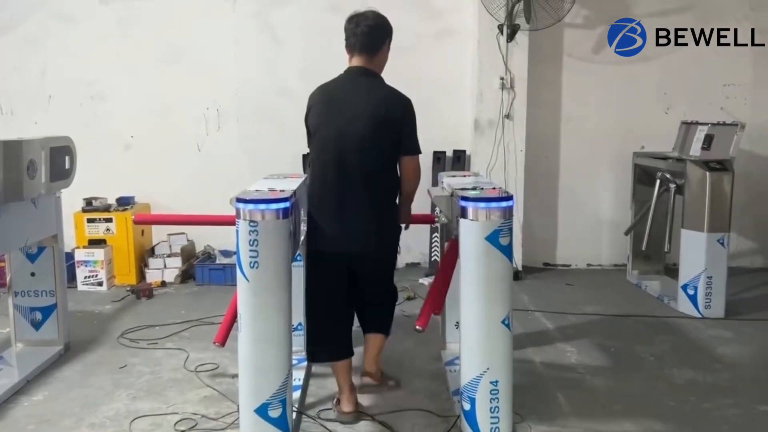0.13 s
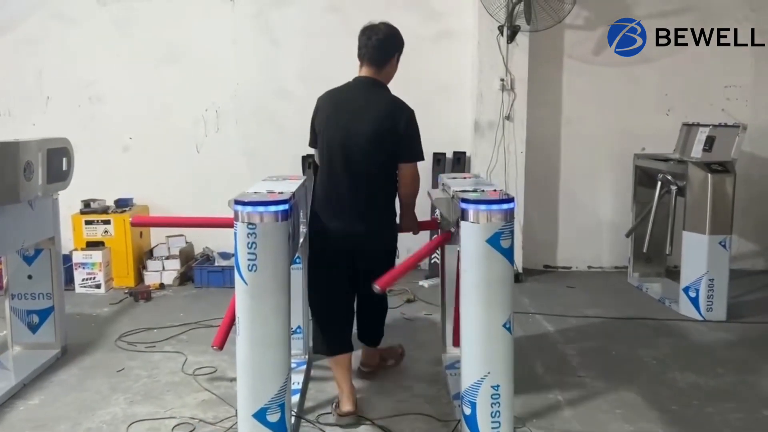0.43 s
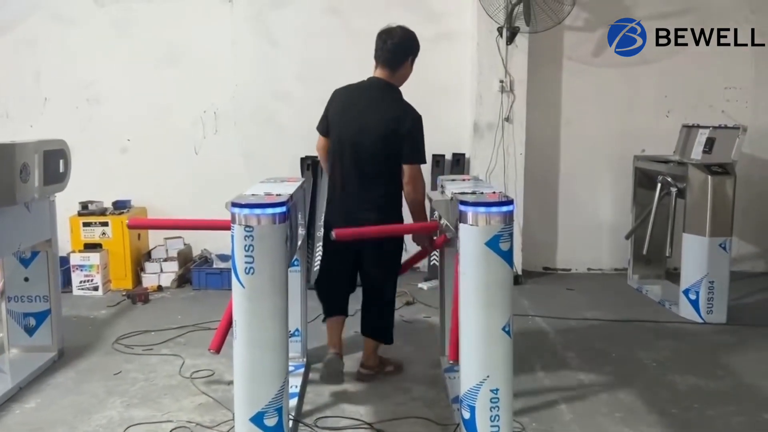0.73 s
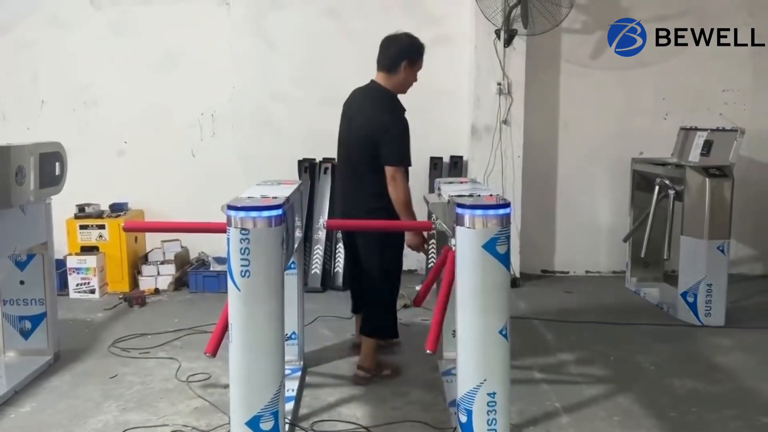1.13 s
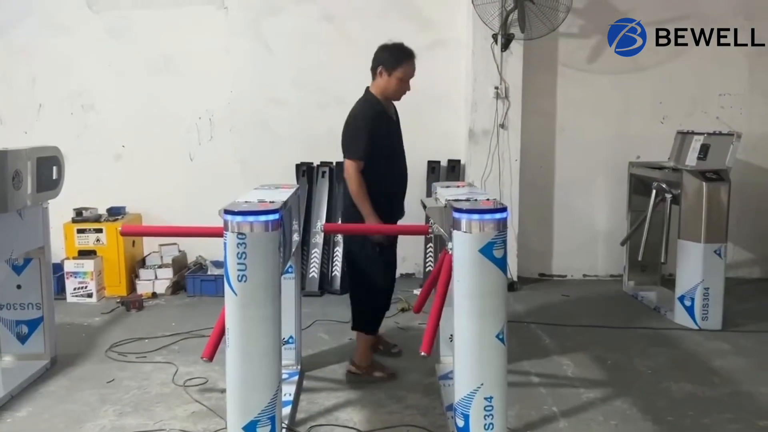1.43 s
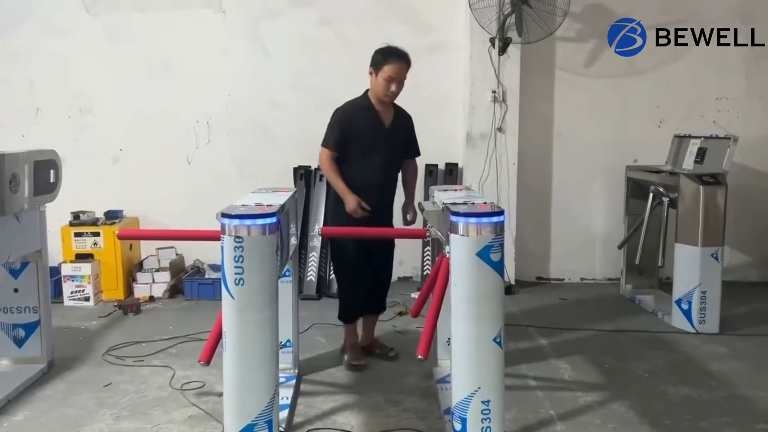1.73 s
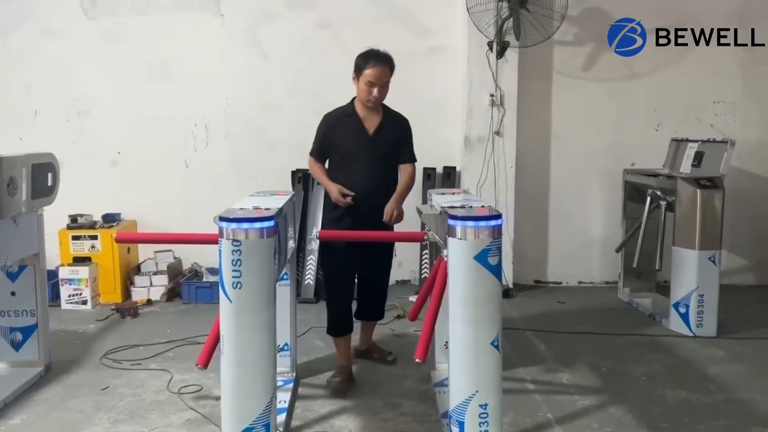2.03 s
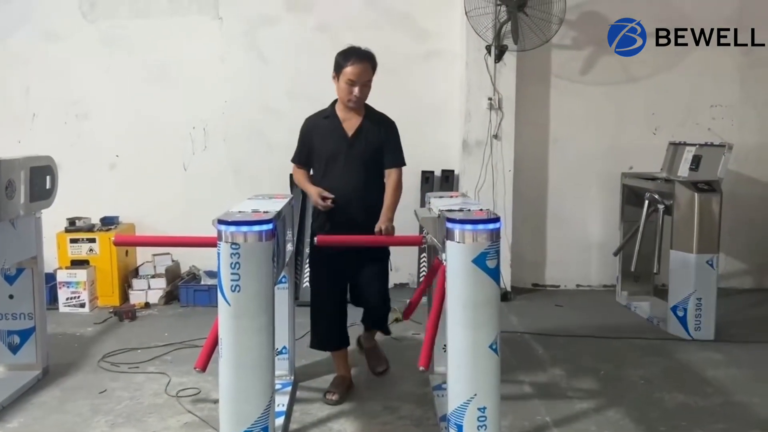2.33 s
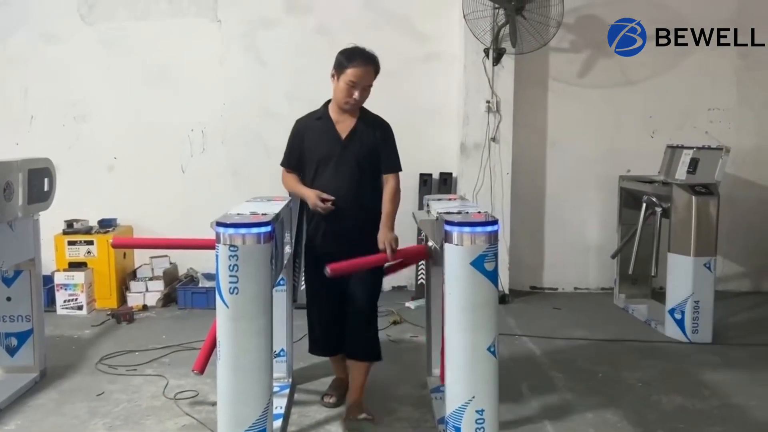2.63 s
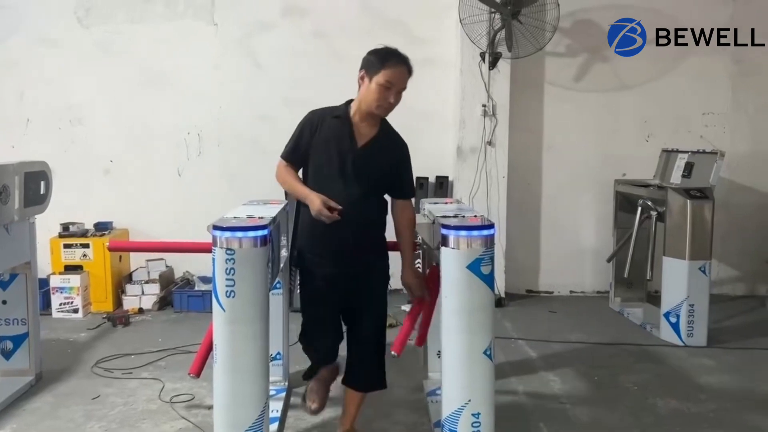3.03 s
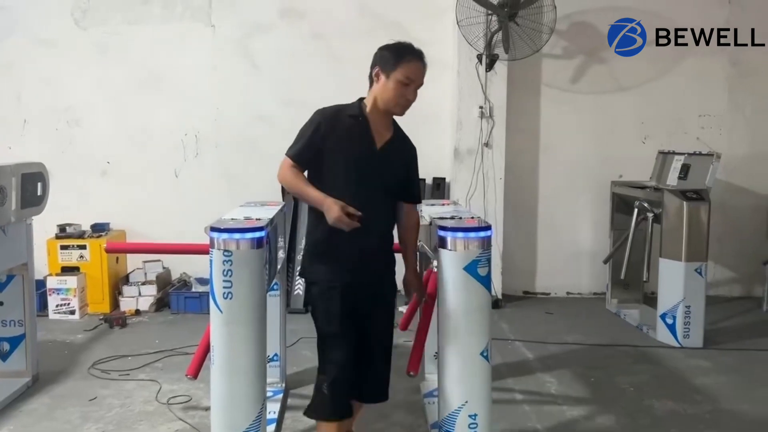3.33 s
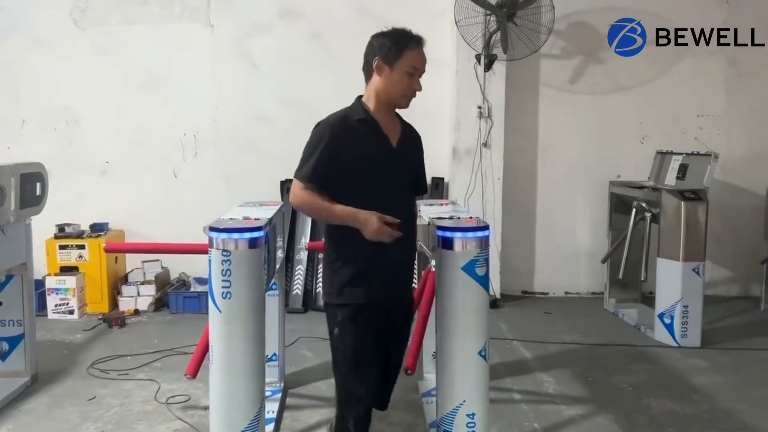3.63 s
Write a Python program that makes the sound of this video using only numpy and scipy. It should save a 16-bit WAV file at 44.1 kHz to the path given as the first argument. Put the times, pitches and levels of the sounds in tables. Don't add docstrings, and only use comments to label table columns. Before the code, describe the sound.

A metal turnstile turns in a bare concrete workshop. Its latch snaps and rattles brightly at 0.45-0.6 s, a loud roller click lands at 0.64 amid low hub rumble, then dry pawl clicks at 0.9 and hollow cabinet clunks until 1.2, all echoing. Soft sandal thuds follow near 1.4, 2.3, 2.75, 3.2 and 3.5 with faint scuffs. Fans rush and cicadas buzz throughout, on a peak-limited, compressed phone microphone.

```python
import sys
import numpy as np
from scipy import signal
from scipy.fft import rfft, irfft, next_fast_len
from scipy.io import wavfile
from scipy.ndimage import uniform_filter1d, minimum_filter1d, map_coordinates

SR = 44100
rng = np.random.default_rng(int(sys.argv[2]) if len(sys.argv) > 2 else 0)


def dump_mix(stems):
    frames = np.atleast_2d(stems).T
    limited = np.clip(frames, -1, 1)
    pcm = np.round(limited * 32767).astype(np.int16)
    wavfile.write(sys.argv[1], SR, pcm)


def rack_gain(trim_db):
    fader = np.asarray(trim_db, float)
    return 10 ** (fader / 20)


N = 167580


def unit(x):
    return x / np.sqrt(np.mean(x ** 2) + 1e-20)


def along(points, hz):
    f, v = np.transpose(points)
    return np.interp(np.log(hz + 1), np.log(f + 1), v, left=v[0] - 40, right=v[-1] - 40)


def wobble(rate, size=N):
    return map_coordinates(rng.standard_normal(100), [np.arange(size) * rate / SR])


def filtered(x, response):
    m = 2 * next_fast_len(len(x) // 2 + 4096)
    return irfft(rfft(x, m) * response(np.fft.rfftfreq(m, 1 / SR)), m)[:len(x)]


def coloured(x, spectrum):
    def response(hz):
        cepstrum = irfft(np.log(rack_gain(along(spectrum, hz)) + 1e-6))
        cepstrum[1:len(hz) - 1] *= 2
        cepstrum[len(hz):] = 0
        return np.exp(rfft(cepstrum))
    return filtered(x, response)


def rush(spectrum, patchy_db):
    z = signal.stft(rng.standard_normal(N), nperseg=512)[2]
    patches = uniform_filter1d(rng.standard_normal(z.shape), size=5, axis=0)
    patches = uniform_filter1d(patches, size=14, axis=1)
    noise = signal.istft(z * rack_gain(patchy_db * unit(patches)), nperseg=512)[1][:N]
    return unit(coloured(noise, spectrum))


# pitch_hz, fade_by_60_db_s
HALL_FADE = [(150, .85), (800, 1.0), (2500, 1.0), (8000, .55), (12000, .42)]


def hall(x):
    hz, t, z = signal.stft(rng.standard_normal(SR * 6 // 5), SR, nperseg=256)
    pitch, fade = np.transpose(HALL_FADE)
    t60 = np.interp(np.log(hz + 1), np.log(pitch), fade)
    tail = signal.istft(z * rack_gain(-60 * t / t60[:, None]), SR, nperseg=256)[1]
    tail *= 1 - np.exp(-np.arange(len(tail)) / SR / .014)
    return signal.fftconvolve(x, tail / np.linalg.norm(tail))


def struck(hits, modes, colour, ring_db, damp, crack_s, attack_s, wet_db, blur, tilts=None):
    scatter_db = 2.5
    out = np.zeros(N + 3 * SR)
    t = np.arange(SR // 2) / SR
    for k, (start_s, db) in enumerate(hits):
        ring = 0
        for hz, level, t60 in modes:
            fade_db = -60 * t / min(t60 * damp, .6)
            loudness = rack_gain(level + scatter_db * rng.standard_normal() + fade_db)
            ring = ring + loudness * np.sin(2 * np.pi * hz * t + blur * wobble(70, size=len(t)))
        crack = coloured(rng.standard_normal(len(t)) * rack_gain(-60 * t / crack_s), colour)
        blow = rack_gain(ring_db) * ring + crack / np.abs(crack).max()
        blow *= 1 - np.exp(-t / attack_s)
        if tilts:
            treble = rack_gain(tilts[k])
            blow = filtered(blow, lambda hz: (1 + 1j * treble * hz / 5000) / (1 + 1j * hz / 5000))
        wet = rack_gain(wet_db) * hall(blow)
        wet[:len(t)] += blow
        start = round(start_s * SR)
        out[start:][:len(wet)] += rack_gain(db) * wet[:len(out) - start]
    return out[:N]


# start_s, level_db
SNAP_HITS = [
    (.4535, -15.5),
    (.4565, -7),
    (.4615, -10.5),
    (.473, -5),
    (.482, -5.5),
    (.514, -9),
    (.5406, -19.5),
    (.575, -8),
]
SNAP_TREBLE = [16.5, 10, 9.5, -9, -29, -12, 6, -12]
# pitch_hz, level_db, fade_by_60_db_s
LATCH_MODES = [(806, -1.5, 0.096), (882, -12, 0.28), (933, -2, 0.24), (1200, -1.5, 0.11), (1754, -6, 0.16),
               (1820, -9.5, 0.11), (1902, -8, 0.066), (3026, -16, 0.16), (4100, -21.5, .1),
               (4686, -10, 0.054), (7710, -4, 0.075), (7960, -10, 0.15), (8300, -10, 0.072),
               (11000, -16, 0.1)]
# pitch_hz, level_db
SNAP_NOISE = [(150, -4), (914, 2.5), (4200, -12), (5800, -22), (7900, -9.5), (9800, -10.5), (11200, -10.5),
              (12100, -20)]


def latch_snap():
    return struck(SNAP_HITS, LATCH_MODES, SNAP_NOISE, ring_db=-12.0, damp=0.73, crack_s=0.037,
                  attack_s=0.00043, wet_db=1.5, blur=0.46, tilts=SNAP_TREBLE)


# start_s, level_db
CLUNK_HITS = [
    (.918, -12),
    (.930, -4),
    (.955, -9),
    (.98, -13),
    (1.02, -10.5),
    (1.045, -11),
    (1.1, -18),
    (1.17, -10),
]
# pitch_hz, level_db, fade_by_60_db_s
CABINET_MODES = [(115, -11.5, 0.23), (141, -4.5, 0.25), (178.7, 2, 0.31), (243, -5, 0.21),
                 (298.6, -2.5, 0.3), (480, -14, 0.33), (683, -15, 0.13), (830, -20, 0.089)]
# pitch_hz, level_db
CABINET_NOISE = [(53, -38), (90, -6.5), (182, -3.5), (459, -14.5), (486, -10.5), (615, -17), (3000, -40),
                 (3900, -80), (6600, -120)]


def hub_clunks():
    return struck(CLUNK_HITS, CABINET_MODES, CABINET_NOISE, ring_db=-7.5, damp=0.49, crack_s=0.092,
                  attack_s=0.0023, wet_db=-0.1, blur=.3)


# start_s, level_db
LURCHES = [
    (.47, -17),
    (.52, -29),
    (.59, -10.5),
    (.628, -11.5),
    (.665, -8),
    (.695, -6.5),
    (.735, -12),
]
# pitch_hz, level_db, fade_by_60_db_s
FRAME_MODES = [(106.6, -1.5, 0.32), (150, -4, .2), (192, -7, 0.23), (245, 0, 0.21), (335, -7, 0.14)]


def hub_rumble():
    return struck(LURCHES, FRAME_MODES, CABINET_NOISE, ring_db=-6.5, damp=0.79, crack_s=0.066,
                  attack_s=0.0046, wet_db=-2.5, blur=0.21)


# start_s, level_db
CAM_HITS = [
    (.639, 1),
    (.654, -7),
    (.704, -13),
]
# pitch_hz, level_db, fade_by_60_db_s
ROLLER_MODES = [(760, -11, 0.19), (1360, -7, 0.044), (1977, -3, 0.018), (2310, 0.5, 0.045),
                (2540, -11, 0.016), (7400, -31, 0.049)]
# pitch_hz, level_db
ROLLER_NOISE = [(300, -19), (1000, -15.5), (2400, -14.5), (3000, -28.5), (5500, -32.5), (7800, -26.5),
                (10900, -24.5)]


def cam_click():
    return struck(CAM_HITS, ROLLER_MODES, ROLLER_NOISE, ring_db=-11.5, damp=0.74, crack_s=0.031,
                  attack_s=0.001, wet_db=-1.5, blur=0.35)


# start_s, level_db
PAWL_HITS = [
    (.896, -17),
    (.9035, -11),
    (.908, -8.5),
    (.9135, -9.5),
    (.930, -19),
    (.945, -25),
]
PAWL_TREBLE = [-22, -20, -16, 5, 10.5, 13]
# pitch_hz, level_db, fade_by_60_db_s
PAWL_MODES = [(782, 1, 0.03), (926, -7, 0.045), (1320, -8, 0.047), (2110, -3, 0.01), (3930, -31, .02),
              (8650, -12, 0.016), (11450, -13, 0.022)]
# pitch_hz, level_db
PAWL_NOISE = [(400, -5), (1400, -4), (3300, -10), (4200, -14.5), (5500, -20), (8000, -23), (9900, -28.5),
              (11700, -16)]


def pawl_clicks():
    return struck(PAWL_HITS, PAWL_MODES, PAWL_NOISE, ring_db=-10, damp=1.2, crack_s=0.032,
                  attack_s=0.00051, wet_db=1.5, blur=0.88, tilts=PAWL_TREBLE)


# start_s, level_db
HEEL_HITS = [
    (1.4, -12),
    (1.48, -16.5),
    (2.325, -7),
    (2.395, -23),
    (2.75, -15.5),
    (3.17, -15),
    (3.52, -14),
    (3.64, -24.5),
]
# pitch_hz, level_db, fade_by_60_db_s
SLAB_MODES = [(131.5, 9, 0.16), (110, -13, 0.24), (176, -3, 0.28), (380, -7.5, 0.12)]
# pitch_hz, level_db
HEEL_NOISE = [(50, -80.5), (110, 7.5), (250, -4.5), (600, -15), (1500, -64)]


def heel_thuds():
    return struck(HEEL_HITS, SLAB_MODES, HEEL_NOISE, ring_db=-5.5, damp=0.99, crack_s=0.066,
                  attack_s=0.0063, wet_db=-2.0, blur=0.14)


# start_s, length_s, level_db, treble_db
SCUFF_STROKES = [
    (1.315, 0.06, -31.5, 2),
    (2.29, 0.058, -34.5, 2.5),
    (2.406, 0.074, -30.5, -25),
    (2.629, 0.089, -37, 6),
    (2.739, 0.07, -31.5, -16),
    (2.844, 0.051, -34.5, -13),
    (3.181, 0.039, -31, -15),
]
# pitch_hz, level_db
GRIT_NOISE = [(300, -0.5), (900, 0.5), (2400, -6), (4000, -27), (6000, -34)]
# pitch_hz, level_db
DUST_NOISE = [(3500, -30), (5500, 1.5), (7500, -0.5), (9800, -5), (11500, 0)]


def sole_scuffs():
    t = np.arange(N) / SR
    grit_level, dust_level = np.zeros(N), np.zeros(N)
    for start_s, length, db, treble in SCUFF_STROKES:
        peak = start_s + length / 4
        width = np.where(t < peak, length / 4, length)
        stroke = rack_gain(db) * np.exp(-((t - peak) / width) ** 2)
        grit_level += stroke
        dust_level += stroke * rack_gain(treble - 12)
    grains = rng.standard_normal((2, N)) * (rng.random((2, N)) < .1)
    grains *= rack_gain(2 * rng.exponential(size=(2, N)))
    scuff = unit(coloured(grains[0], GRIT_NOISE)) * grit_level
    scuff += unit(coloured(grains[1], DUST_NOISE)) * dust_level
    return scuff + rack_gain(-3.5) * hall(scuff)[:N]


# pitch_hz, level_db
AIR_NOISE = [(13, -7), (22, -7.5), (107, 0.5), (425, -9.5), (544, -12.5), (591, -14.5), (642, -14),
             (2340, -28.5), (3000, -29.5), (3900, -32), (6600, -120)]
# pitch_hz, level_db, wander_hz
FAN_TONES = [(39.8, -36.5, 1.3), (59.94, -37, 2.1), (77.6, -31.5, 2.26), (96.7, -32.5, 1.03),
             (117.2, -30.5, 2.24), (134.7, -37, 2.35), (527.8, -36.5, 1.39), (551.7, -36, 1.66),
             (629, -44.5, 2.1)]
# pitch_hz, level_db
HISS_NOISE = [(2500, -16.5), (4600, -2), (5300, 1.5), (7400, -3), (9800, -13.5), (11800, 3.5)]


def fans():
    air = rack_gain(-22) * rush(AIR_NOISE, patchy_db=1.5)
    air *= rack_gain(.5 * wobble(1.5) + .6 * wobble(9))
    tones = np.zeros(N)
    for hz, db, wander in FAN_TONES:
        level = rack_gain(db + 1.17 * wobble(6.25)) * np.sqrt(2)
        turns = np.cumsum(hz + wander * wobble(5)) / SR + rng.random()
        tones += level * np.sin(2 * np.pi * turns)
    hiss = rack_gain(-54.5 + 1.5 * wobble(4)) * rush(HISS_NOISE, patchy_db=2.2)
    return air + tones + hiss


# pitch_hz, width_hz, level_db, swells_per_s
SINGERS = [(3548, 400, 3, 16), (3760, 350, -3, 14), (4030, 390, -4.5, 13), (4195, 540, -7.5, 14)]
# start_s, level_db
NEAR_EFFORT = [(0.0, -35), (0.45, -34.5), (0.49, -34), (0.7, -35), (1.53, -36.5), (1.72, -30.5),
               (2.25, -34.5), (2.54, -33.5), (3.8, -36)]
# start_s, level_db
CHORUS_EFFORT = [(0.0, -31), (0.57, -29), (1.05, -30.5), (1.36, -30), (3.8, -29.5)]


def cicadas():
    partials_db, swell_db = (0, -24, -28.5), 2
    out, t = np.zeros(N), np.arange(N) / SR
    efforts = (NEAR_EFFORT, CHORUS_EFFORT, CHORUS_EFFORT, CHORUS_EFFORT)
    for (hz, width, db, swells), effort in zip(SINGERS, efforts):
        def body(f):
            total = 0
            for k, partial_db in enumerate(partials_db, 1):
                loss = 1j * f * width * k
                total = total + rack_gain(partial_db) * (loss / ((k * hz) ** 2 - f * f + loss)) ** 2
            return total
        clicks = rng.standard_normal(N) * (rng.random(N) < .12)
        turns = np.cumsum(swells * (1 + 0.13 * wobble(2.96))) / SR + rng.random()
        swell = np.sin(2 * np.pi * turns)
        effort_db = np.interp(t, *np.transpose(effort))
        level_db = db + effort_db + swell_db * swell + 0.67 * wobble(2.396)
        out += rack_gain(level_db) * unit(filtered(clicks, body))
    return out


def scene():
    turnstile = latch_snap() + cam_click() + pawl_clicks() + hub_clunks() + hub_rumble()
    feet = heel_thuds() + sole_scuffs()
    return (turnstile + feet + fans() + cicadas())[None]


TOP_HZ = 12080


def microphone(x):
    def dip(f, hz, width, depth):
        return 1 - depth * 1j * f * width / (hz * hz - f * f + 1j * f * width)
    return filtered(x, lambda f: dip(f, 10100, 1480, .8) * dip(f, 9780, 500, .98) * (f < TOP_HZ))


def limiter(x):
    ceiling, look_s, release_s = .995, .002, .006
    need = np.minimum(1, ceiling / (np.abs(x) + 1e-9))
    look = round(look_s * SR)
    hold = round((look_s + release_s) * SR) // 2 * 2
    gain = minimum_filter1d(need, size=hold + 1, origin=hold // 2 - look)
    return x * uniform_filter1d(gain, size=look)


# pitch_hz, width_hz, extra_level_db
WEAK_BANDS = [(2700, 220, 4), (5115, 610, 11), (6110, 750, 7), (9800, 366, 25), (9720, 1300, 6)]
# pitch_hz, width_hz, extra_share_of_treble
HIDDEN_BANDS = [(9900, 350, .7), (5800, 410, .3), (11600, 250, .3)]


def starve(x):
    keep_db, masking, fickle_db = -7, 0.26, 3
    z = signal.stft(x, SR, window="cosine", nperseg=2048)[2]
    power = np.square(np.abs(z[:1024])).reshape(128, 8, -1).sum(1)
    db = 10 * np.log10(power + 1e-20)
    db -= np.median(db, axis=1, keepdims=True)
    centre = (np.arange(128) + .5) * SR / 256

    def bumps(bands):
        return sum(height * np.exp(-((centre - hz) / width) ** 2) for hz, width, height in bands)

    limit = keep_db + bumps(WEAK_BANDS) - 30 * (centre < 2000)
    fickle = unit(uniform_filter1d(rng.standard_normal(db.shape), size=3, axis=1))
    treble = db[(centre > 4500) & (centre < TOP_HZ)].mean(0)
    share = (centre > 4500) * masking + bumps(HIDDEN_BANDS)
    kept = db > limit[:, None] + np.outer(share, treble) + fickle_db * fickle
    z[:1024] *= np.repeat(kept, 8, axis=0)
    return signal.istft(z, SR, window="cosine", nperseg=2048)[1][:N]


def low_pass(x):
    return signal.sosfilt(signal.butter(12, 13040, fs=SR, output="sos"), x)


def record(dry):
    x = rack_gain(1.5) * microphone(dry[0])
    mix = starve(limiter(x))[None]
    return low_pass(mix)


dry = scene()
out = record(dry)
dump_mix(out)
```